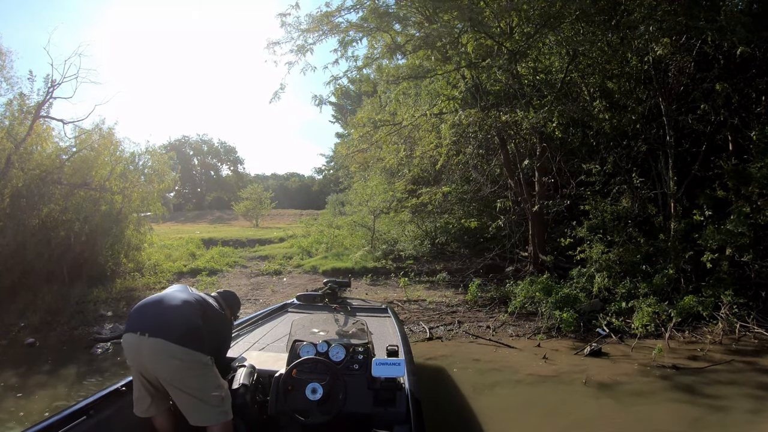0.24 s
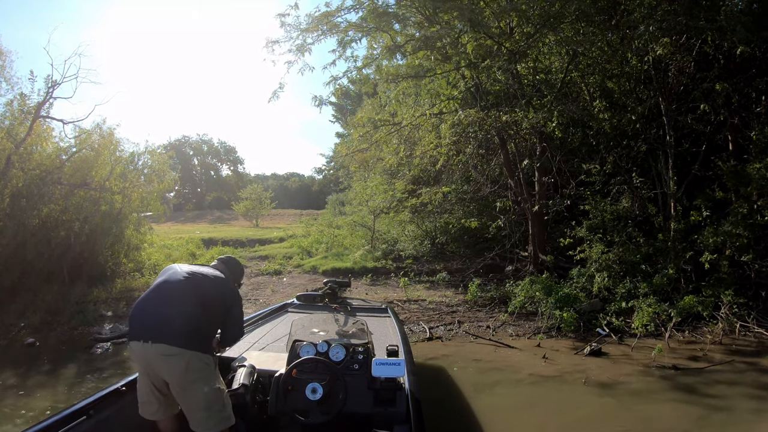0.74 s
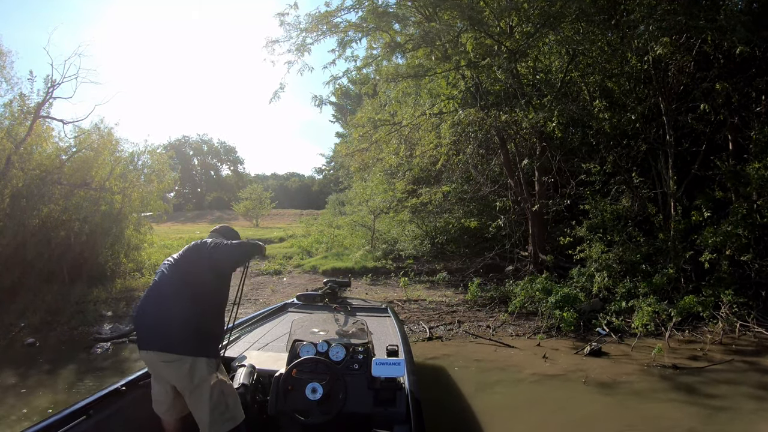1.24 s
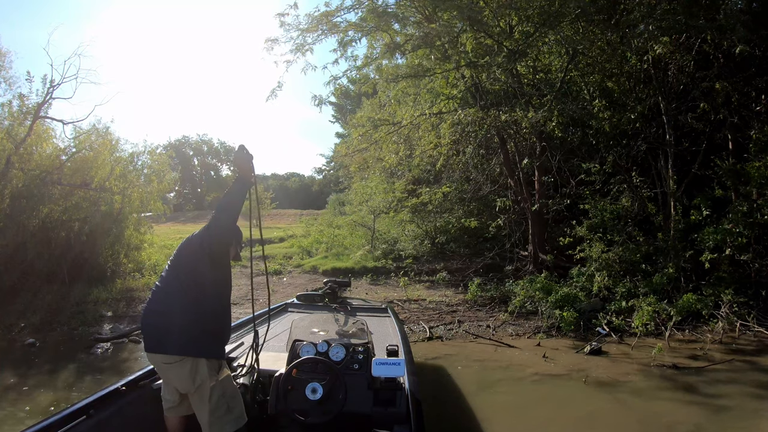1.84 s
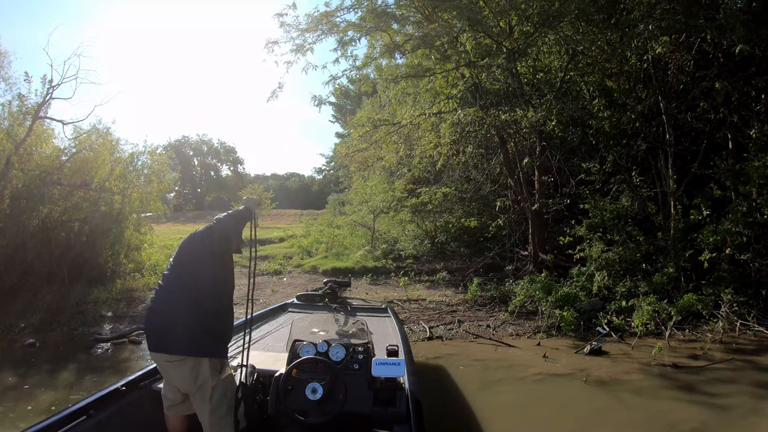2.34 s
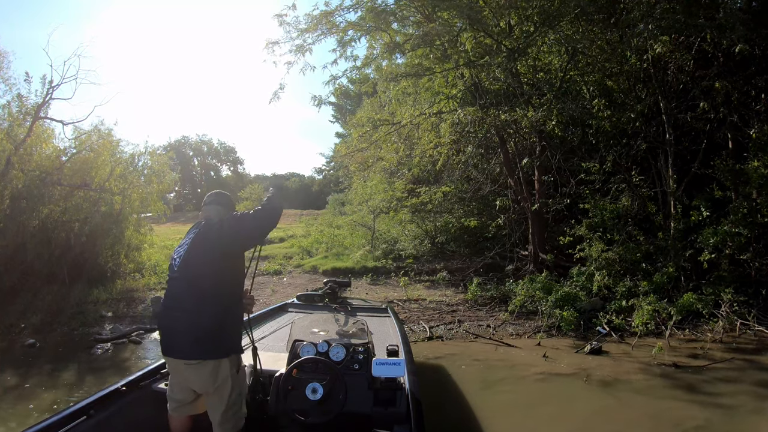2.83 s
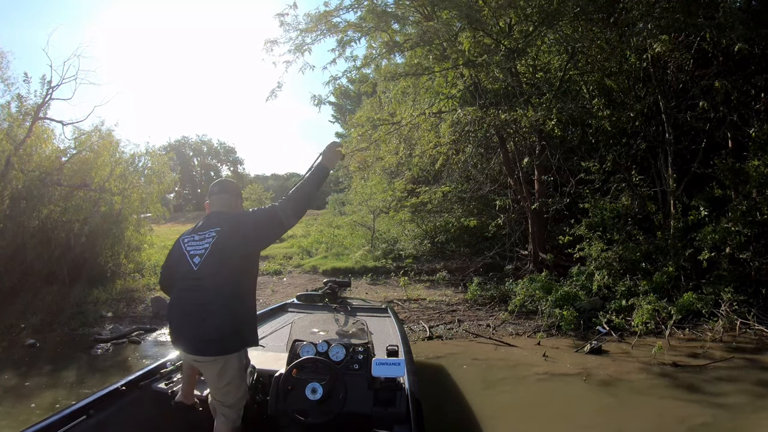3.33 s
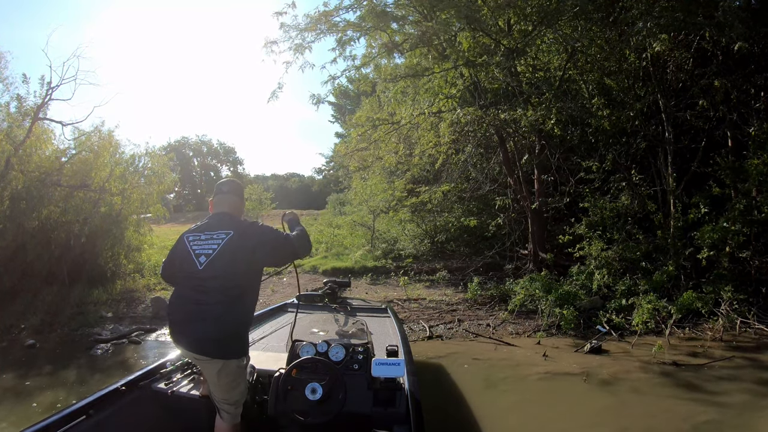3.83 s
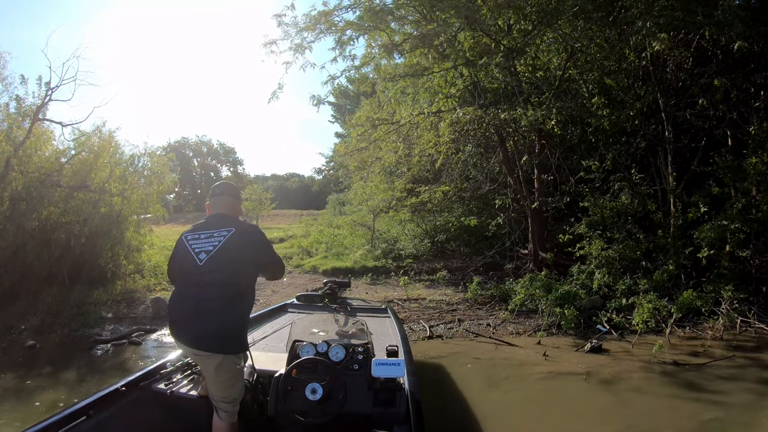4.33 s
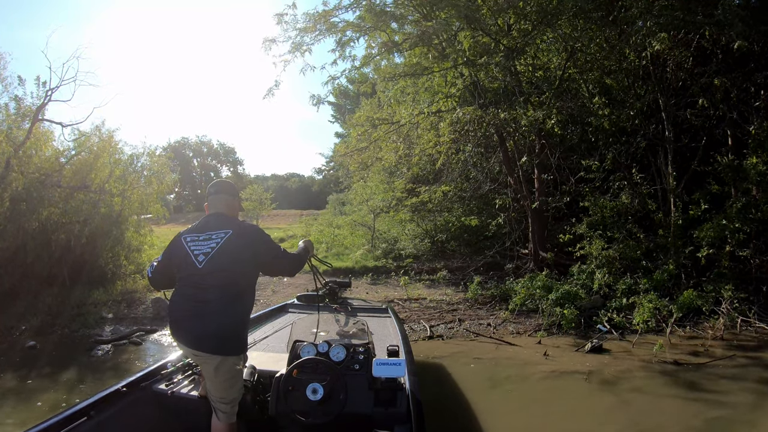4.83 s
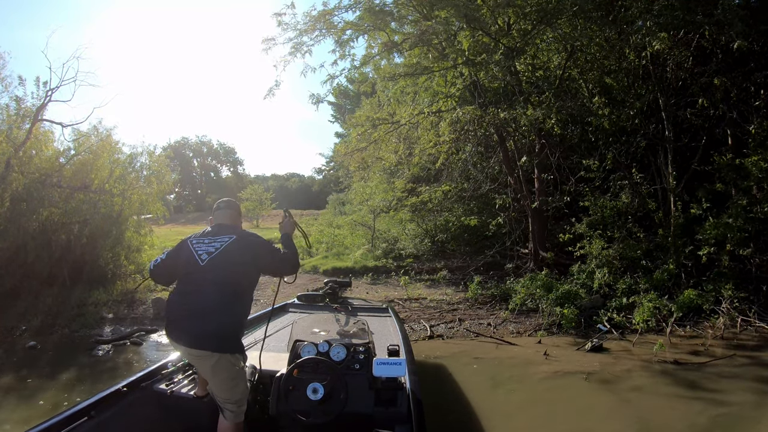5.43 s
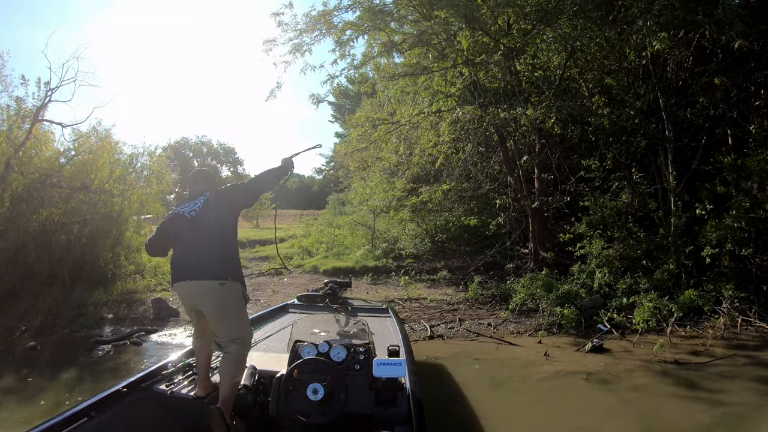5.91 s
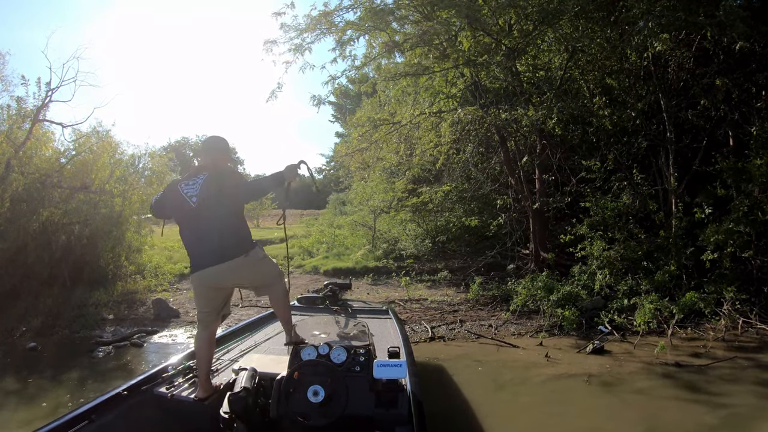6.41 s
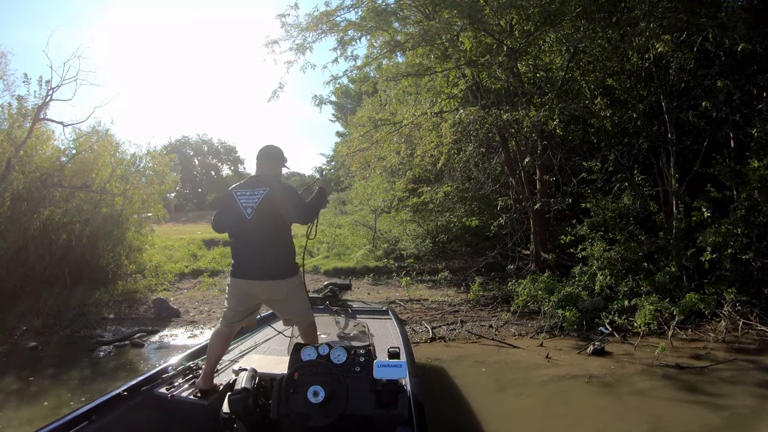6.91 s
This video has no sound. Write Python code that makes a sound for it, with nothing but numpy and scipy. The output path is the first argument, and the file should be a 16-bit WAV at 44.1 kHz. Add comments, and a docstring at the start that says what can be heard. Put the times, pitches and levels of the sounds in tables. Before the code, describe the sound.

A man handles rope and gear on a small boat. Quick hollow knocks and clacks come first, with dragging and gritty scraping, then one strong hull boom with chattering slaps and hard clatter. The rest is quieter: soft soles thudding on the deck, small clicks and a few late knocks. Fluttering insect hiss with nearer chirps, faint whistled and hoarse birds and deep wind-like rumble surround the nearby, central boat.

```python
"""Rope and gear on a small boat

A man handles a rope at a wooded bank: gear knocks as struck modes and noise bursts, and the rope drags
as gritty noise. Soft steps ring the deck; a heavy load booms in the hull, slaps, chatters and clatters.
A dense insect hiss of fluttering noise runs throughout, with nearer chirps, whistled and hoarse far
birds, and a swelling low rumble with a faint drone."""
import sys
import numpy as np
from scipy import signal
from scipy.fft import rfft, irfft, next_fast_len
from scipy.io import wavfile
from scipy.ndimage import map_coordinates

SR = 44100
rng = np.random.default_rng(int(sys.argv[2]) if len(sys.argv) > 2 else 0)


def wav_out(sig):
    """Save sig, one row per channel (or a flat mono array), as 16-bit PCM at SR to the path in sys.argv[1]."""
    wavfile.write(sys.argv[1], SR, np.round(np.clip(np.atleast_2d(sig).T, -1, 1) * 32767).astype(np.int16))


N = 315756


def amp(db):
    """Decibels to gain."""
    return 10 ** (np.asarray(db) / 20)


def unit(x):
    """Scale to rms 1."""
    return x / np.sqrt(np.mean(x ** 2) + 1e-20)


def crest(x):
    """Scale to peak 1."""
    return x / np.abs(x).max()


def along(points, hz):
    """Read (f/Hz, value) points off a log frequency axis."""
    f, value = np.transpose(points)
    return np.interp(np.log(hz + 1), np.log(f + 1), value)


def curves(rows):
    """One value per sample for each column after the time."""
    s, *columns = np.transpose(rows)
    t = np.arange(N) / SR
    return [np.interp(t, s, column) for column in columns]


def wobble(rate):
    """A smooth random curve with rate knots a second."""
    knots = rng.standard_normal(int(N * rate / SR) + 4)
    return map_coordinates(knots, [np.arange(N) * rate / SR])


def filtered(x, response):
    """Shape x by a response of frequency."""
    size = x.shape[-1]
    padded = next_fast_len(size + 8192)  # room for the filter to ring out past the end
    spectrum = rfft(x, padded) * response(np.fft.rfftfreq(padded, 1 / SR))
    return irfft(spectrum, padded)[..., :size]


def noise(spectrum, size=N, grain_db=0):
    """Coloured noise of rms 1; uneven excitation makes it gritty."""
    grain = amp(grain_db * rng.standard_normal(size))
    drive = rng.standard_normal(size) * grain
    return unit(filtered(drive, lambda hz: amp(along(spectrum, hz))))


def burst(spectrum, t60, grain_db=0):
    """A dying puff of noise, peak 1; t60 in s."""
    t = np.arange(SR // 2) / SR
    return crest(noise(spectrum, size=len(t), grain_db=grain_db) * amp(-60 * t / t60))


def soften(x, contact):
    """A yielding contact rounds off the onset (contact time in s); peak 1."""
    t = np.arange(len(x)) / SR
    return crest(x * (1 - np.exp(-t / contact)))


def ring(modes, scatter_db, damping, top_hz):
    """Struck modes, peak 1: each blow scatters their strengths, and a soft one spares those above top_hz."""
    t = np.arange(SR // 2) / SR
    hz, db, t60 = np.transpose(modes)[:, :, None]
    strength = amp(db + scatter_db * rng.standard_normal(hz.shape)) / (1 + (hz / top_hz) ** 2)
    phase = 1.3 * rng.standard_normal(hz.shape)
    decay = amp(-60 * damping * t / t60)
    swing = np.sum(strength * np.sin(2 * np.pi * hz * t + phase) * decay, axis=0)
    return -soften(swing, contact=0.0016)


def add(track, s, sound):
    """Mix a sound in at a time in s."""
    part = track[max(round(s * SR), 0):][:len(sound)]
    part += sound[:len(part)]


# drift of the insect chorus, before a small lift: [t/s, level/dB]
CHORUS = [(0.05, -31), (0.6, -31), (2.64, -29.5), (3.17, -31), (4.56, -29.5), (5.88, -30.5), (6.69, -29.5),
          (7.1, -30)]
# colour of the insect hiss: [f/Hz, relative level/dB]
INSECTS = [(4500, -41), (5700, -31.5), (6450, -17.5), (6750, -19), (6980, -13.5), (7200, -20), (8200, -15),
           (10000, -7), (11200, -2), (12400, 0.5), (13500, -2), (14600, -7), (15700, -10)]
# a nearer insect chirps in bouts: [start t/s, number of chirps, level/dB]
BOUTS = [(2.29, 3, -30), (2.785, 1, -28.5), (2.976, 2, -28), (4.125, 2, -28), (4.477, 3, -31),
         (4.895, 1, -31), (5.555, 1, -27), (6.108, 4, -30.5), (6.725, 2, -29)]
CHIRP_GAP_S, CHIRP_S = 0.1066, 0.043  # from one onset to the next, and length of a chirp


def insects():
    """Coloured noise hisses with a fast flutter; evenly spaced swells of noise make the nearer chirps."""
    chorus_db, = curves(CHORUS)
    flutter_hz = 42 + 0.33 * wobble(6.15)
    flutter = np.sin(2 * np.pi * np.cumsum(flutter_hz) / SR)
    level = amp(chorus_db + 0.43 + 0.85 * flutter + 0.17 * wobble(23))
    chirps = np.zeros(N)
    for s, count, db in BOUTS:
        for k in range(round(count)):
            add(chirps, s + k * CHIRP_GAP_S, amp(db) * np.hanning(int(CHIRP_S * SR)))
    mid = level * noise(INSECTS, grain_db=3.0) + chirps * noise(INSECTS)
    side = amp(-45) * level * noise(INSECTS)
    return np.array([mid + side, mid - side])


# drift of the far rush, before a fixed lift: [t/s, level/dB]
FAR_AIR = [(2.95, -58.5), (3.55, -58.5), (5.16, -61), (6.61, -56.5), (7.1, -58)]
# colour of the far rush: [f/Hz, relative level/dB]
AIR = [(100, 12), (250, 1), (470, -1.5), (750, 4), (1050, 1.5), (1500, -9), (2100, -13.5), (3200, -16.5),
       (4500, -15.5), (8000, -5.5)]
# colour of the low rumble: [f/Hz, relative level/dB]
RUMBLE = [(3, 4), (8, 5), (14, 5.5), (22, 0.5), (36, -8.5), (48, -15.5), (70, -18.5), (110, -25),
          (170, -34), (260, -40), (600, -67.5)]
# swells of rumble and drone: [middle t/s, half width t/s, rise in level/dB]
SWELLS = [(0.4, 0.52, 4.5), (1.4, 0.13, 5), (2.72, 0.22, 9.5), (3.62, 0.12, 5), (5.27, 0.11, 5.5),
          (6.9, 0.66, 4.5)]
RUMBLE_DB, DRONE_DB, DRONE_HZ = -27, -42, 35  # levels before the swells and wobble; centre of the drone


def air():
    """Low noise swells lumpily with a wavering sine drone, under the noise rush of the open country."""
    t = np.arange(N) / SR
    air_db, = curves(FAR_AIR)
    swell_db = sum(db * np.exp(-((t - s) / width) ** 2) for s, width, db in SWELLS)
    rumble = amp(RUMBLE_DB + swell_db + 2.07 * wobble(10)) * noise(RUMBLE)
    drone_level = amp(DRONE_DB + swell_db + 1.7 * wobble(2.67))
    drone = drone_level * np.sin(2 * np.pi * np.cumsum(DRONE_HZ + wobble(1.58)) / SR)
    far = amp(air_db + 10.0 + 0.53 * wobble(4.04))
    mid = rumble + drone + far * noise(AIR)
    side = amp(-26.5) * far * noise(AIR)
    return np.array([mid + side, mid - side])


# modes of the deck panels, before scatter and damping: [f/Hz, relative level/dB, t60 t/s]
PANEL = [(268, -10.5, 0.2), (316, 8, 0.05), (356, 0.5, 0.096), (380, -3, 0.028), (456, -3, 0.07),
         (508, 0, 0.056), (636, 1.5, 0.062), (698, -4.5, 0.068), (713, -18, 0.099), (818, 5, 0.028),
         (1230, -46, 0.038), (1430, -33, 0.048)]


def strike_panels(scatter_db, damping, top_hz=4000):
    """A contact rings the short modes of the deck panels, peak 1."""
    return ring(PANEL, scatter_db, damping, top_hz)


# pulls of rope and gear over the boat: [start t/s, length t/s, hollow body level/dB, rasp level/dB]
PULLS = [(0.0, 0.92, -52.5, -67.5), (1.006, 0.58, -43, -56.5), (2.099, 0.29, -38, -39.5),
         (3.483, 0.49, -61.5, -62.5), (5.847, 0.34, -53.5, -62), (6.55, 0.3, -55, -83)]
PULL_ATTACK_S = 0.054
BODY_FALL_DB_PER_S, RASP_FALL_DB_PER_S = 83, 73  # after the pull ends


def pulls():
    """Gains of drumming and rasp: each pull sets in, holds and dies away."""
    t = np.arange(N) / SR
    body, rasp = np.zeros((2, N))
    for s, length, body_db, rasp_db in PULLS:
        onset = np.clip((t - s) / PULL_ATTACK_S, 0, 1) ** 2
        after = np.maximum(t - s - length, 0)
        body += onset * amp(body_db - BODY_FALL_DB_PER_S * after)
        rasp += onset * amp(rasp_db - RASP_FALL_DB_PER_S * after)
    return body, rasp


# colour of the drumming on the hollow boat: [f/Hz, relative level/dB]
BODY = [(90, -31), (200, 12), (300, -3), (400, -11), (510, 1.5), (730, -22), (1000, -10), (1600, -21),
        (3000, -39)]
# colour of the rope's rasp: [f/Hz, relative level/dB]
ROPE = [(500, -21), (1300, 0), (2000, -0.5), (2700, -3), (3500, -3), (4200, -4), (5500, -6.5), (8000, -8),
        (15000, -43)]
# small knocks during a pull: mean rate, then level and random spread relative to its drumming
JOSTLES_PER_S, JOSTLE_DB, JOSTLE_SPREAD_DB = 14, 8, 4


def drag():
    """Rope and gear catch and slip: gritty noise rasps and drums, and random hits jostle the panels."""
    body_gain, rasp_gain = pulls()
    slips = wobble(70)  # one unevenness moves both noises
    body = body_gain * unit(amp(4.2 * slips) * noise(BODY, grain_db=6.0))
    rasp = rasp_gain * unit(amp(2.9 * slips) * noise(ROPE, grain_db=6))
    hit_db = JOSTLE_DB + JOSTLE_SPREAD_DB * rng.standard_normal(N)
    hits = (rng.random(N) < JOSTLES_PER_S / SR) * amp(hit_db)
    jostles = signal.fftconvolve(hits * body_gain, strike_panels(scatter_db=1, damping=1.6))[:N]
    return body + rasp + jostles


# how long the trees hold each pitch: [f/Hz, t60 t/s]
WOODS = [(100, 0.057), (1000, 0.86), (3500, 0.35), (10000, 0.097)]


def woods(x):
    """The trees scatter back a diffuse tail: noise that dies at its own pace in each band."""
    hz, t, z = signal.stft(rng.standard_normal(SR), SR, nperseg=256)
    decay = amp(-60 * t / along(WOODS, hz)[:, None])
    tail = signal.istft(z * decay, SR, nperseg=256)[1]
    return signal.fftconvolve(x, tail / np.linalg.norm(tail))[:N]


# modes of the whole hull, before scatter and damping: [f/Hz, relative level/dB, t60 t/s]
HULL = [(47, -22, 0.96), (64.2, 2, 0.13), (73.8, -3.5, 0.13), (108, -3.5, 0.13), (127.3, -6, 0.15),
        (161, 0, 0.088), (191.6, -4.5, 0.076), (240, -4.5, 0.054), (295, -6.5, 0.075)]


def strike_hull(scatter_db, damping, lowest=0):
    """A blow booms in the hull's modes from index lowest upwards, peak 1."""
    return ring(HULL[lowest:], scatter_db, damping, top_hz=4000)


def tick(centre_hz, t60):
    """A short click of hard parts in one broad band."""
    band = [(centre_hz / 5, -20), (centre_hz, 0), (centre_hz * 2, -10), (centre_hz * 4, -36)]
    return burst(band, t60)


# gear knocking on the deck: [t/s, panel level/dB, hard clack level/dB, tick level/dB, tick f/Hz]
KNOCKS = [(0.085, -44, -34, -57, 2500), (0.237, -30, -34, -56, 2500), (0.291, -23.5, -21, -51, 1600),
          (0.341, -30.5, -37, -44, 3200), (0.432, -29, -27.5, -39, 2020), (0.783, -42, -41, -37, 2500),
          (0.986, -32, -38, -44, 3000), (1.052, -36, -39, -61, 1800), (1.09, -29, -49, -42.5, 2400),
          (1.201, -29.5, -36, -42, 2600), (1.224, -28, -35, -43, 3200), (1.312, -24.5, -26, -51, 2000),
          (1.328, -28, -29.5, -51, 2500), (1.373, -33, -28, -50, 2800), (1.508, -31, -41, -41, 2000),
          (1.871, -34, -35, -53, 2500), (2.648, -38.5, -38, -48, 1980), (2.829, -46, -39, -44.5, 3370),
          (4.325, -50, -56, -44, 3500), (4.964, -53, -56, -46, 2400), (5.52, -60, -55, -46, 4200),
          (5.699, -35, -32.5, -31.5, 1650), (6.493, -55, -41, -42.5, 4000), (6.668, -36.5, -43, -56, 1600),
          (6.83, -35.5, -31.5, -41, 2140), (6.935, -53, -46, -34, 4800)]
# colour of the hard clack: [f/Hz, relative level/dB]
KNOCK = [(200, -38), (340, 10.5), (420, -1.5), (510, -5), (760, 10.5), (1050, -2.5), (1450, -5),
         (2000, -37), (4000, -67)]
THUD_DB = -7  # the hull under a knock, relative to the panels


def knocks():
    """Each contact clacks, rings the panels, nudges the hull and ticks at the surface."""
    out = np.zeros(N)
    for s, panel_db, clack_db, tick_db, tick_hz in KNOCKS:
        panel = strike_panels(scatter_db=1.5, damping=0.81)
        thud = amp(THUD_DB) * strike_hull(scatter_db=2.0, damping=0.75, lowest=3)
        clack = amp(clack_db) * burst(KNOCK, t60=0.04)
        click = amp(tick_db) * tick(tick_hz, t60=0.076)
        add(out, s, amp(panel_db) * (panel + thud) + clack + click)
    return out


# whistled notes, before arch, quaver and distance: [t/s, length t/s, start f/Hz, end f/Hz, level/dB]
NOTES = [(0.47, 0.1, 3210, 3280, -56), (0.607, 0.063, 4080, 3900, -58), (0.805, 0.057, 2940, 2410, -57.5),
         (0.922, 0.06, 3950, 4350, -55), (1.21, .04, 4330, 4080, -54), (1.897, 0.055, 2590, 2670, -63),
         (3.036, 0.043, 4100, 3280, -55), (3.099, 0.034, 3150, 2650, -57), (3.289, 0.047, 2660, 3370, -52),
         (3.29, 0.26, 2585, 2360, -62), (3.73, 0.044, 4840, 4750, -55), (3.789, 0.1, 3750, 3320, -60),
         (4.214, 0.026, 2520, 3190, -55.5), (4.253, 0.054, 3330, 3850, -52),
         (4.32, 0.07, 3510, 2980, -52.5), (4.432, 0.085, 4100, 3750, -55), (4.506, 0.026, 2620, 2670, -57),
         (5.007, 0.044, 2550, 3050, -52), (5.29, 0.1, 3110, 3016, -52), (5.541, 0.043, 2350, 2800, -54.5),
         (5.84, 0.041, 3280, 3400, -57)]
NOTE_ARCH, NOTE_QUAVER = 0.0196, 0.018  # shares of the pitch: bulge in mid-note, random waver


def birds():
    """Far whistled notes, each a slightly arched, quavering sine glide, smeared by the trees."""
    out = np.zeros(N)
    quaver = 1 + NOTE_QUAVER * wobble(160)
    for s, length, start_hz, end_hz, db in NOTES:
        u = np.linspace(0, 1, int(length * SR))
        arch = np.sin(np.pi * u)
        glide = start_hz + (end_hz - start_hz) * u
        pitch = glide * (1 + NOTE_ARCH * arch) * quaver[int(s * SR):][:len(u)]
        add(out, s, amp(db) * arch * np.sin(2 * np.pi * np.cumsum(pitch) / SR))
    return amp(-2) * out + amp(-5) * woods(out)


# hoarse far calls: [t/s, length t/s, centre f/Hz, width f/Hz, level/dB]
CALLS = [(1.2, 0.26, 3300, 500, -58.5), (1.38, 0.5, 2900, 1100, -62), (3.403, 0.28, 1050, 150, -62.5),
         (3.533, 0.26, 3680, 700, -62.5), (3.855, 0.46, 3300, 220, -67), (5.85, 0.39, 3350, 420, -59),
         (5.851, 0.27, 1215, 143, -56.5), (5.918, 0.22, 4500, 1100, -61)]


def calls():
    """Hoarse bird calls from deep in the trees: narrow noise that swells fast and fades slowly."""
    out = np.zeros(N)
    for s, length, hz, width_hz, db in CALLS:
        u = np.linspace(0, 1, int(length * SR))
        hiss = rng.standard_normal(len(u))
        voice = filtered(hiss, lambda f: 1 / (1 + (2 * (f - hz) / width_hz) ** 4))
        add(out, s, amp(db) * np.sin(np.pi * np.sqrt(u)) * unit(voice))
    return out


# soft soles on the deck: [t/s, hull level/dB before a small lift, panel level/dB]
STEPS = [(1.933, -29.5, -27.5), (3.614, -29.5, -32), (3.645, -34, -45), (3.903, -35, -46),
         (3.927, -31.5, -42), (4.779, -35.5, -36.5), (5.021, -34, -46.5), (5.7, -32, -30),
         (5.913, -33, -41)]


def steps():
    """Soles settle on the deck: a slow contact leaves a dull, rounded thud of hull and panels."""
    out = np.zeros(N)
    for s, hull_db, panel_db in STEPS:
        hull = soften(strike_hull(scatter_db=4.0, damping=0.92), contact=0.013)
        panel = soften(strike_panels(scatter_db=4.5, damping=1.0, top_hz=453), contact=0.003)
        add(out, s, hull * amp(hull_db + 1.5) + panel * amp(panel_db))
    return out


# the load lands, rocks and settles: [t/s, hull level/dB, panel level/dB, slap level/dB]
LANDINGS = [(2.151, 1, -6.5, -3), (2.18, -9.5, -27, -31), (2.219, -10, -44, -32), (2.316, -12.5, -37, -44),
            (2.337, -13, -12.5, -41), (2.362, -16.5, -38, -26), (2.45, -23.5, -43, -43),
            (2.55, -28, -38, -37)]
# colour of the slap: [f/Hz, relative level/dB]
SLAP = [(150, -6.5), (300, 2), (550, 8.5), (850, -1.5), (1050, -11), (1280, -3.5), (1800, -23), (4000, -87)]
# its hard parts clatter: [t/s, peak level/dB]
CLATTERS = [(2.157, -17.5), (2.205, -22.5), (2.24, -22), (2.361, -13), (2.374, -17), (2.481, -33)]
# colour of the clatter: [f/Hz, relative level/dB]
CLATTER = [(400, -38), (1200, 3.5), (2300, 3.5), (2900, -1), (3700, 4), (5000, -9), (6500, -16),
           (15000, -33)]
CHATTER_S, CHATTER_LOSS_DB = 0.006, 4.5  # time between the contacts of a landing, loss per contact


def drop():
    """The heavy load booms in the hull, slaps and chatters on the deck, and its hard parts clatter."""
    out = np.zeros(N)
    for s, hull_db, panel_db, slap_db in LANDINGS:
        add(out, s, amp(hull_db) * strike_hull(scatter_db=2.0, damping=1.0))
        for k in range(3):
            # a broad blow favours the low modes
            panel = amp(panel_db) * strike_panels(scatter_db=1.5, damping=1.74, top_hz=460)
            slap = amp(slap_db) * soften(burst(SLAP, t60=0.026), contact=0.00047)
            add(out, s + k * CHATTER_S, amp(-k * CHATTER_LOSS_DB) * (panel + slap))
    for s, db in CLATTERS:
        add(out, s, amp(db) * burst(CLATTER, t60=0.044, grain_db=6.5))
    return out


def scene():
    """The boat lies straight ahead; only its echo from the bank differs a little between the ears."""
    boat = drag() + knocks() + steps() + drop()
    echo = amp(-19.0) * woods(boat)
    spread = amp(-38.5) * woods(boat) * np.array([[1], [-1]])
    return insects() + air() + boat + echo + spread + birds() + calls()


def record(dry):
    """Round off the highest peaks, then keep nothing from the band limit upwards."""
    held = dry / (1 + np.abs(dry / 0.97) ** 6) ** (1 / 6)
    return filtered(held, lambda hz: hz < 15900)


dry = scene()
out = record(dry)
wav_out(out)
```